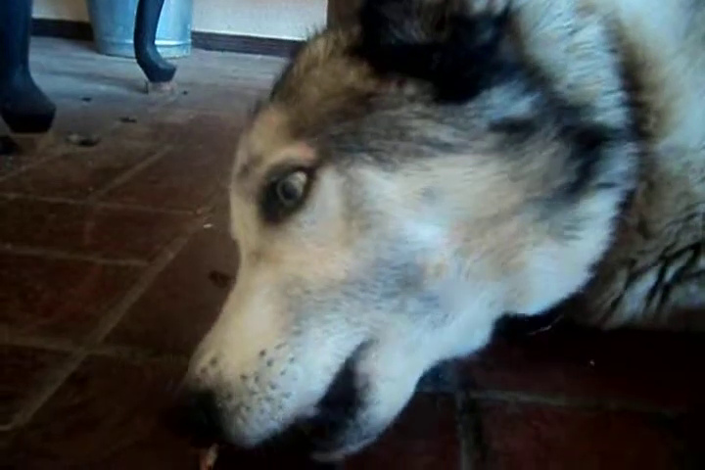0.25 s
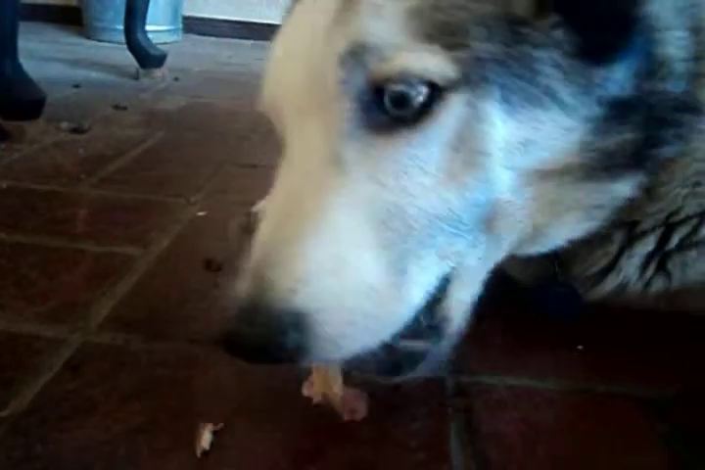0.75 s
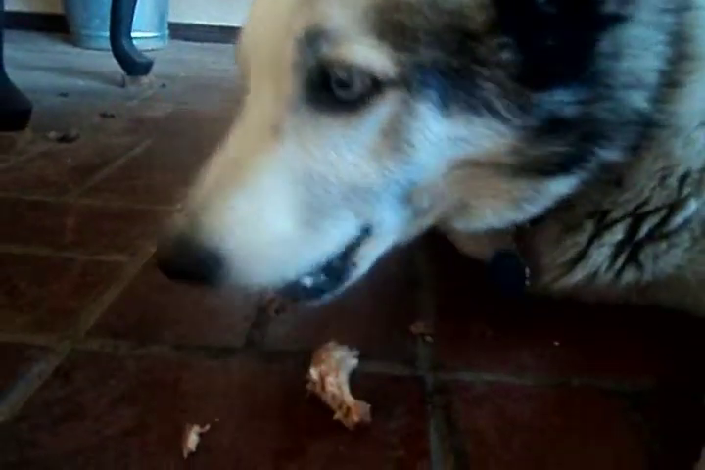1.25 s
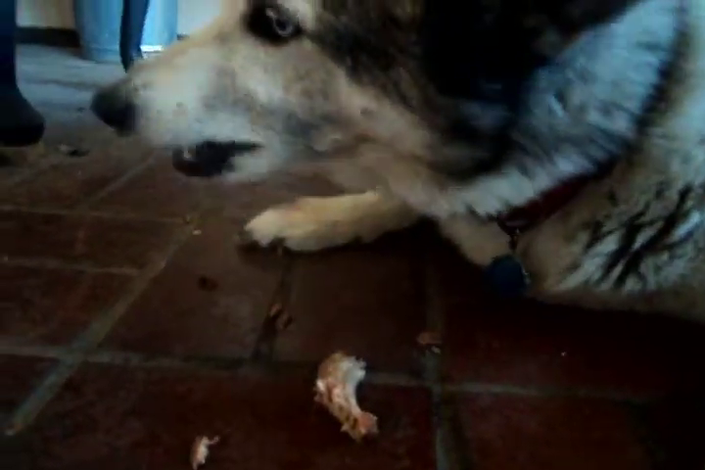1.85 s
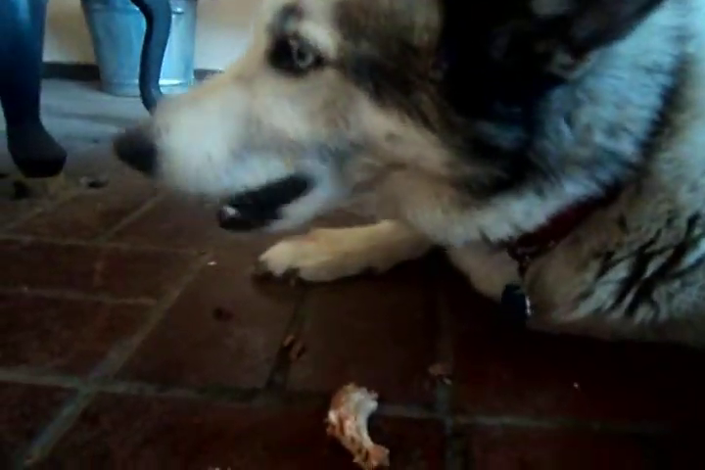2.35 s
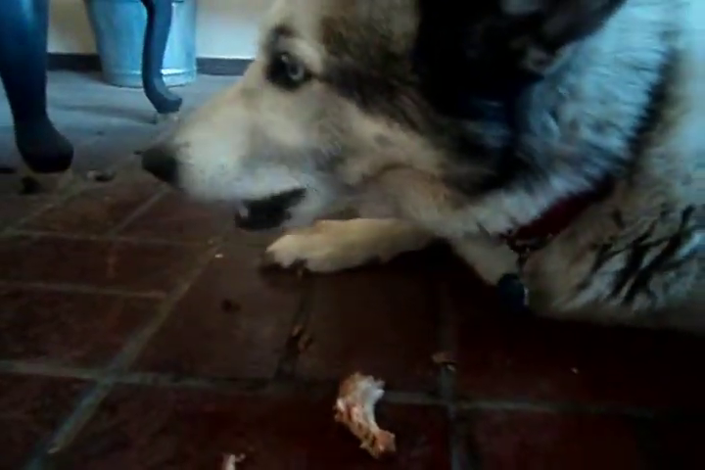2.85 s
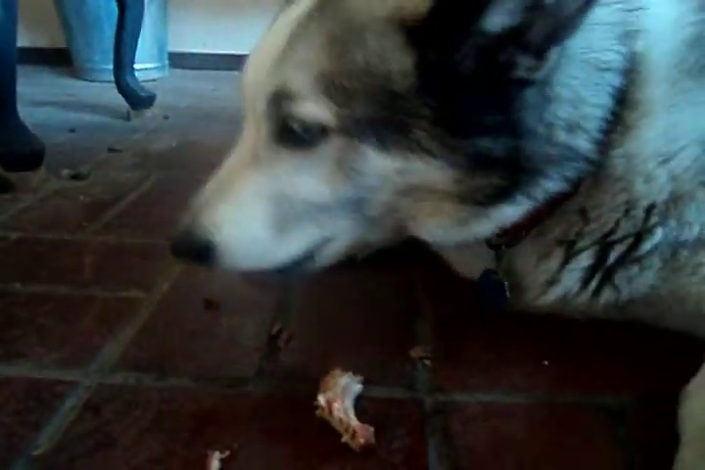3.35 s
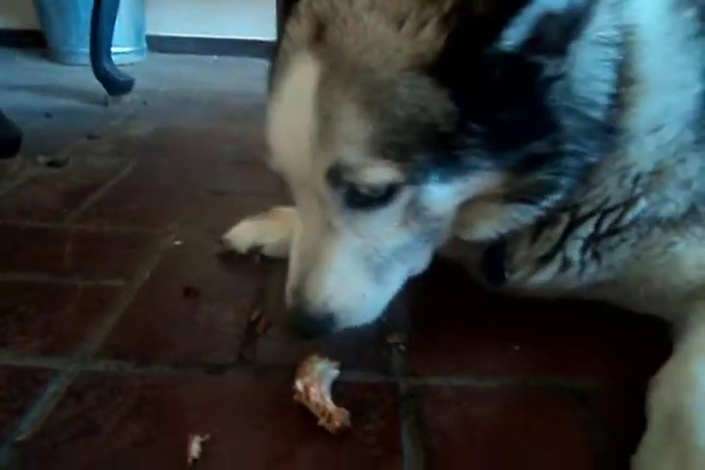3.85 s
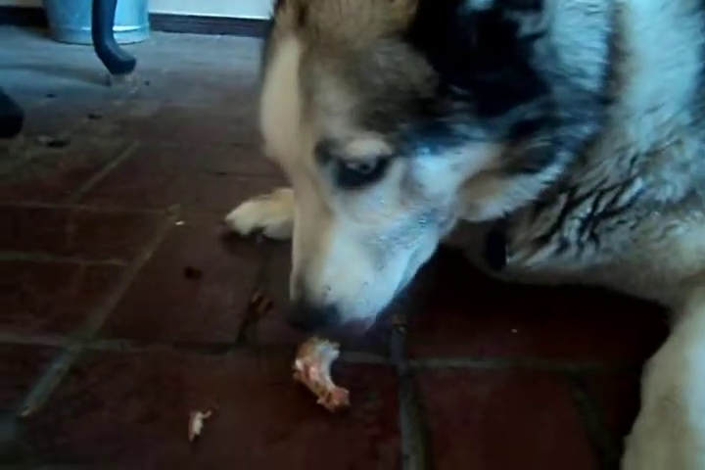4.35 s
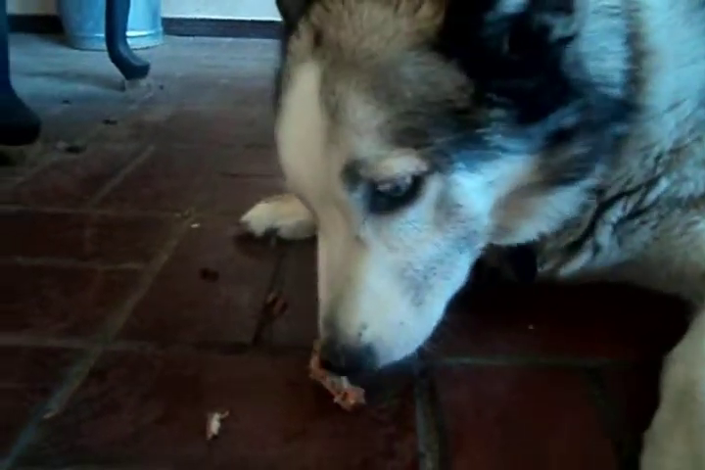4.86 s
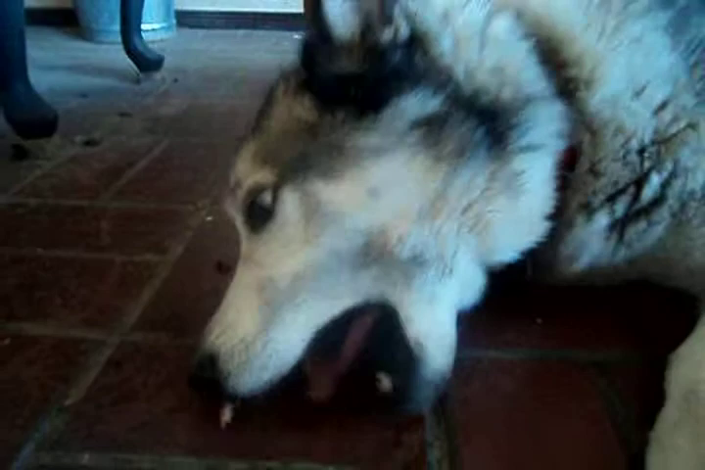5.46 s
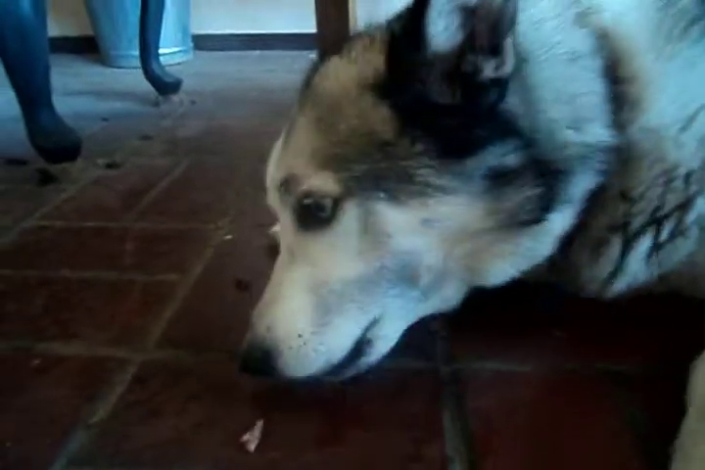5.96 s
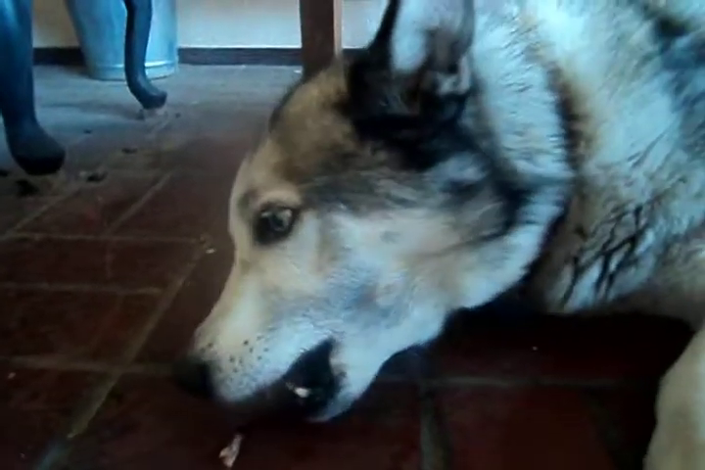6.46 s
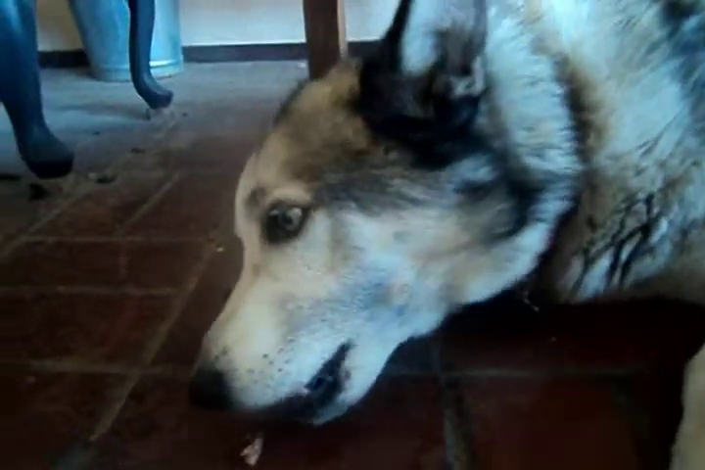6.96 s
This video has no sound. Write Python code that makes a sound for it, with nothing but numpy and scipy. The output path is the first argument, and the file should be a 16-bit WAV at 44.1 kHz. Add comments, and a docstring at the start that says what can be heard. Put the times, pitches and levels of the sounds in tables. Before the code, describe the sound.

A dog cracks a bone with sharp, irregular clicks and wet smacks close by, while another dog barks five times further off in an echoing room.

```python
"""A dog on a tiled floor cracks a bone close to a small microphone: decaying sines for teeth, bone and
mouth hollow, repeated as splinters. Wet smacks and nose breaths are noise in resonances.
A second dog barks five times further off in the house: rough pulses and puffs through an opening throat,
with a strong room tail. Hiss and rumble lie below. Levels are those ahead of the room and microphone."""
import sys
import numpy as np
from scipy import signal
from scipy.io import wavfile
from scipy.ndimage import uniform_filter1d

SR = 44100
rng = np.random.default_rng(int(sys.argv[2]) if len(sys.argv) > 2 else 0)


def wav_record(signal):
    """Record a signal, one row per channel, as 16-bit PCM in the file named by sys.argv[1]."""
    frames = np.transpose(np.atleast_2d(signal))
    bounded = np.clip(frames, -1, 1)
    # unit amplitude maps onto the largest positive 16-bit level
    quanta = np.round(bounded * 32767).astype(np.int16)
    wavfile.write(sys.argv[1], SR, quanta)


def invert_db(level):
    """Linear amplitude ratio for a level in decibels (20 dB per decade), elementwise."""
    return 10 ** (np.asarray(level, dtype=float) / 20)


N = 317520


def evened(x):
    """Scales to rms 1."""
    return x / np.sqrt(np.mean(x ** 2) + 1e-20)


def read(points, hz):
    """Reads a spectrum on a log-frequency axis."""
    f, value = np.transpose(points)
    return np.interp(np.log(hz + 1), np.log(f + 1), value)


def add(mix, start_s, sound):
    """Mixes a sound in at start_s."""
    part = mix[max(round(start_s * SR), 0):][:len(sound)]
    part += sound[:len(part)]


def resonate(x, hz, width_hz):
    """Resonance of gain 1: shifts the curve hz down to zero, smooths, shifts back."""
    turn = np.exp(2j * np.pi * np.cumsum(hz * np.ones(len(x))) / SR)
    r = np.exp(-np.pi * width_hz / SR)
    return 2 * (turn * signal.lfilter([1 - r], [1, -r], x / turn + 1e-18)).real


# Background spectrum. Each row: frequency in Hz, relative density in dB per Hz.
HUSH_SPECTRUM = [(20, -0.5), (60, -4), (125, -2), (300, -4.5), (800, -10.5), (2000, -15), (4000, -19.5),
                 (6500, -23), (7500, -34.5), (9000, -62.5)]


def hush():
    """Steady hiss and rumble: shaped noise with faint drifting patches."""
    level_db, patch_db = -56, 1.2
    frames, hz = N // 256 + 5, np.fft.rfftfreq(1024, 1 / SR)
    a, b, patches = rng.standard_normal((frames, 513, 3)).T
    patches = uniform_filter1d(patches, size=10, axis=0)  # over frequency
    patches = evened(uniform_filter1d(patches, size=20, axis=1))  # over time
    z = (a + 1j * b) * invert_db(read(HUSH_SPECTRUM, hz)[:, None] + patch_db * patches)
    noise = signal.istft(z, nperseg=1024, noverlap=768)[1][:N]
    return invert_db(level_db) * evened(noise)


def smack(level_db, hollow_hz, length_s, chance):
    """Wet noise in a narrow hollow starts quickly and fades."""
    wet = resonate(resonate(chance, hollow_hz, 130), hollow_hz, 320)[:round(length_s * SR)]
    u = np.linspace(0, 1, len(wet))
    swell = np.minimum(u / 0.12, 1) * np.sqrt(1 - u) * 1.42  # 1.42 roughly restores the rms
    return invert_db(level_db) * evened(wet) * swell


# Smacks of tongue and lips. Each row: start in seconds, approximate rms in dB, hollow in Hz, length in seconds.
SMACK_EVENTS = [(0, -47.5, 790, 0.008), (0.612, -55.5, 1070, .04), (.895, -53.5, 1110, 0.031),
                (0.931, -54.5, 1020, 0.035), (1.807, -59.5, 930, 0.058), (1.941, -53, 240, 0.16),
                (1.944, -56, 793, 0.085), (5.044, -52, 820, 0.017), (5.727, -54.5, 650, .11),
                (5.87, -59.5, 870, 0.031), (6.105, -57.5, 784, 0.05), (6.221, -60, 860, 0.053),
                (6.332, -61, 1450, 0.092), (6.821, -61, 890, 0.024), (6.951, -51.5, 820, 0.048)]


def smacks():
    """Tongue and lips part wetly: one noise burst a row."""
    out = np.zeros(N)
    for (start_s, *row), chance in zip(SMACK_EVENTS, rng.standard_normal((len(SMACK_EVENTS), 8000))):
        add(out, start_s, smack(*row, chance))
    return out


# Nose resonances. Each row: centre in Hz, width in Hz, relative level in dB.
NOSE_RESONANCES = [(2180, 1300, -4.5), (3500, 1100, 3.5), (5200, 520, -0.5)]
# Breaths through the chewing dog's nose. Each row: start in seconds, length in seconds, rms between fades in dB.
SNIFF_EVENTS = [(0, 0.12, -74), (1.427, .44, -62), (1.887, 0.42, -59), (6.613, 0.7, -70)]


def sniffs():
    """Air noise in the nose resonances swells and fades with each breath."""
    fade_share = 0.4  # of a breath, both ends together
    air, flow = rng.standard_normal(N), np.zeros(N)
    air = evened(sum(invert_db(db) * resonate(air, hz, width_hz) for hz, width_hz, db in NOSE_RESONANCES))
    for start_s, length_s, level_db in SNIFF_EVENTS:
        add(flow, start_s, invert_db(level_db) * signal.windows.tukey(round(length_s * SR), fade_share))
    return air * flow


# Enamel rings in every tick. Each row: frequency in Hz, level in dB ahead of the hardness, t60 in seconds.
ENAMEL_RINGS = [(3600, -10, 0.006), (4100, -4, 0.0016), (6240, -12.5, 0.0038)]


def crack(peak_db, hollow_hz, tick_hz, tick_db, crunch_db, chance):
    """Bone-and-enamel tick plus a few cycles of mouth hollow; splinters repeat them ever more softly."""
    t = np.arange(len(chance)) / SR
    tick = np.sin(2 * np.pi * tick_hz * t) * invert_db(-60 * t / 0.0039) * (1 - np.exp(-t / 0.00018))
    hard_db = 7.8 * np.log2(tick_hz / 3500)  # a higher tick is a harder contact and wakes the enamel more
    for hz, level_db, t60_s in ENAMEL_RINGS:
        tick += invert_db(hard_db + level_db - 60 * t / t60_s) * np.sin(2 * np.pi * hz * t)

    hollow_t60_s = min(0.035, 10 / hollow_hz)
    ring = np.sin(2 * np.pi * hollow_hz * t) * invert_db(-60 * t / hollow_t60_s) * (1 - np.exp(-t / 0.000079))
    # nothing of the hollow's ring sounds below about half its pitch
    ring = signal.lfilter(*signal.butter(2, hollow_hz * 0.47, "high", fs=SR), ring)

    ring = invert_db(peak_db) * ring / abs(ring).max()
    tick = invert_db(peak_db + tick_db) * tick / abs(tick).max()
    splinters = (abs(chance) > 2) * chance * invert_db(-60 * t / 0.062)
    splinters /= np.linalg.norm(splinters)
    muffled = ring + invert_db(-6) * tick  # later splinters break deeper in the mouth
    return ring + tick, invert_db(crunch_db) * signal.fftconvolve(muffled, splinters)


# Teeth break bone. Each row: start in seconds, hollow peak in dB, mouth hollow in Hz, tick in Hz,
# tick over hollow in dB, crunch of the splinters in dB.
CRACK_EVENTS = [(0.179, -37.5, 2290, 3930, 8.5, 2.5), (0.229, -23, 1250, 3320, 2.5, 0.5),
                (0.247, -23, 1256, 2930, 3, 4.5), (0.9044, -45, 1060, 3320, 4, -10),
                (1.0127, -42.5, 720, 3500, 3.5, -9), (1.144, -41, 675, 1290, -5, -4.5),
                (2.066, -25.5, 886, 1830, 7.5, 2), (5.2666, -25.5, 1056, 3300, -4, -2.5),
                (5.362, -22.5, 606, 3410, 9, -19), (5.393, -27.5, 700, 3500, -11.5, -25),
                (5.9257, -36.5, 1400, 2080, 3, -1), (6.1054, -42.5, 814, 1720, -1, -1),
                (6.2572, -41.5, 1080, 1700, 0, 1), (6.3311, -28.5, 1200, 3600, -6.5, 1),
                (6.485, -46, 1480, 3400, 8, 7.5), (6.7192, -47.5, 1160, 2420, 4, 6.5),
                (6.7932, -24.5, 930, 1790, 0.5, -4.5), (7.073, -46, 910, 1740, -3, -2)]
# A tooth slips off the bone, a bare tick. Each row: start in seconds, tick peak in dB, tick in Hz.
TICK_EVENTS = [(0.2287, -22.5, 2230), (0.4409, -38.5, 3100), (0.819, -39.5, 2680), (0.831, -39.5, 3300),
               (0.947, -42, 3740), (1.316, -39, 3460), (2.0665, -20, 3160), (2.0828, -29.5, 2980),
               (5.3622, -19.5, 1700), (5.5427, -37, 3260), (5.8633, -43, 3720), (6.5712, -36.5, 4280),
               (6.736, -41, 2630), (6.7936, -29, 2730)]
# The jaw or the bone knocks dully. Each row: start in seconds, peak in dB, frequency in Hz.
KNOCK_EVENTS = [(0.2475, -24.5, 650), (0.249, -27.5, 305), (2.0737, -35, 315), (2.4856, -37.5, 508),
                (6.8033, -34.5, 213), (6.8734, -38.5, 716)]


def bone_blows():
    """Cracks, ticks and knocks share one mechanism; returns direct blows and splinter crunch."""
    tick_hollow_hz, tick_over_db, tick_crunch_db = 910, 12.5, -4.5
    overtone_ratio, overtone_db, knock_crunch_db = 3.1, -24.5, -11
    ticks = [(s, db - tick_over_db, tick_hollow_hz, hz, tick_over_db, tick_crunch_db)
             for s, db, hz in TICK_EVENTS]
    knocks = [(s, db, hz, hz * overtone_ratio, overtone_db, knock_crunch_db) for s, db, hz in KNOCK_EVENTS]
    events = CRACK_EVENTS + ticks + knocks
    out, crunch = np.zeros(N), np.zeros(N)
    for (start_s, *row), chance in zip(events, rng.standard_normal((len(events), 4000))):
        blow, splinters = crack(*row, chance)
        add(out, start_s, blow)
        add(crunch, start_s, splinters)
    return out, crunch


# Room decay. Each row: frequency in Hz, t60 in seconds.
ROOM_DECAY = [(250, 0.83), (700, 0.48), (1700, 0.66), (4500, 0.54)]


def room(x, delay_s):
    """Sparse taps of random sign, one in every 20 samples, each band dying at its own speed."""
    taps = np.zeros(SR)
    at = np.arange(0, SR - 20, 20) + rng.integers(0, 20, SR // 20 - 1)
    taps[at] = rng.choice([-1., 1.], len(at))
    hz, t, z = signal.stft(taps, SR, nperseg=256)
    decay = invert_db(-60 * t / read(ROOM_DECAY, hz)[:, None])
    tail = signal.istft(z * decay, SR, nperseg=256)[1]
    tail = np.concatenate([np.zeros(round(delay_s * SR)), tail])
    return signal.fftconvolve(x, tail / np.linalg.norm(tail))[:N]


def gesture(rise_s, hold_s, peak_db, top_hz, widest):
    """Effort in dB, pitch in Hz, roughness and mouth opening along one bark."""
    release_s, start_db, sag_db, end_db, bend = 0.039, -27, -4, -23, 1.6
    first_hz, climb_power, droop_share = 285, 1.6, 0.21  # droop: pitch lost in the release
    shut_share, opening_share, closing_share = 0.32, 0.21, 0.075  # opening: time constant over rise_s
    rough_start, rough_end = 0.35, 0.65
    t = np.arange(0, rise_s + hold_s + release_s, 1 / SR)
    rise = np.clip(t / rise_s, 0, 1)
    hold = np.clip((t - rise_s) / hold_s, 0, 1)
    release = np.clip((t - rise_s - hold_s) / release_s, 0, 1)

    effort_db = peak_db + start_db * (1 - rise) ** bend + sag_db * hold + end_db * release
    climb_hz = top_hz - (top_hz - first_hz) * (1 - rise) ** climb_power
    hz = climb_hz * (1 - droop_share * release)
    mouth = widest * (1 - (1 - shut_share) * np.exp(-t / rise_s / opening_share))
    mouth = mouth * (1 - closing_share * (hold + release))
    rough = rough_start + (rough_end - rough_start) * t / t[-1]
    return effort_db, hz, rough, mouth


# Throat resonances. Each row: centre in Hz ahead of the mouth factor, first-pass width in Hz,
# level in dB ahead of the rasp tilt.
THROAT_RESONANCES = [(686, 506, -12.5), (1020, 150, 10), (1493, 375, -6.5), (2415, 840, -15),
                     (3380, 650, -14), (4280, 900, -25), (6850, 1700, -31.5)]


def bark(row, tongue, chance):
    """Jittered pulses and puffs of noise pass a throat that opens as the pitch climbs."""
    effort_db, hz, rough, mouth = gesture(*row)
    jitter, noise = chance[:, :len(hz)]
    turns = np.cumsum(hz * (1 + 1.5 * rough * uniform_filter1d(jitter, size=100))) / SR
    # the noise takes over above these harmonics
    folds = sum(invert_db(-2.5 * k) * np.cos(2 * np.pi * k * turns) for k in range(1, 12))
    folds *= 1 + 0.5 * rough * np.cos(np.pi * turns)  # strong and weak pulses alternate
    puffs = (0.51 + np.exp(-(turns % 1) / 0.31)) * noise
    drive = (1 - rough) * evened(folds) + 2.97 * rough * evened(puffs)

    rasp_db_per_octave = 25 * (mouth - 0.97)  # a wider mouth is brighter
    voice = 0
    for k, (f, width_hz, db) in enumerate(THROAT_RESONANCES + [tongue]):
        gape = mouth if k < 3 else mouth ** 0.48  # the jaw moves the low resonances most
        gain = (-1) ** k * invert_db(db + rasp_db_per_octave * np.log2(f / THROAT_RESONANCES[1][0]))
        voice = voice + gain * resonate(resonate(drive, f * gape, width_hz), f * gape, 2 * width_hz)

    # the fundamental also leaves through the chest; a lower voice is chestier
    chest_db = -14 - 17.5 * np.log2(hz.max() / 680)
    voice = voice + invert_db(chest_db) * (1 - rough) * hz / hz.max() * np.sin(2 * np.pi * turns)
    effort = invert_db(effort_db)
    return evened(effort * voice) * np.sqrt(np.mean(effort ** 2)) * signal.windows.tukey(len(hz), 0.05)


# Barks. Each row: start in seconds, rise in seconds, hold in seconds, effort peak in dB, top pitch in Hz,
# widest mouth as a factor on the throat (approached, not quite reached).
BARK_EVENTS = [(2.12, 0.063, 0.038, -21.5, 655.6, 1.14), (2.568, 0.066, 0.046, -22.5, 698, 0.99),
               (2.866, 0.062, 0.047, -21, 671.6, 1.005), (3.086, .075, 0.038, -20.5, 682.7, 1.029),
               (3.513, 0.045, 0.015, -28, 462.6, 0.917)]
# One more resonance for each bark. Each row: as in THROAT_RESONANCES.
TONGUE_RESONANCES = [(1660, 570, -17.5), (2270, 230, -1), (2286, 270, -4), (2264, 450, -6.5),
                     (1970, 350, -0.5)]


def barking():
    """Each bark comes from a slightly different spot: direct sound plus a room tail drawn anew."""
    far = np.zeros(N)
    chances = rng.standard_normal((len(BARK_EVENTS), 2, SR // 4))
    for (start_s, *row), tongue, chance in zip(BARK_EVENTS, TONGUE_RESONANCES, chances):
        dog = np.zeros(N)
        add(dog, start_s, bark(row, tongue, chance))
        far += invert_db(-1) * dog + invert_db(-4) * room(dog, 0.012)
    return far


def scene():
    """The near dog is nearly dry, its crunch reaches the walls; the far dog brings its own tails."""
    blows, crunch = bone_blows()
    near = blows + smacks() + sniffs()
    echo = room(invert_db(-41) * near + invert_db(-8.5) * crunch, 0.011)
    return (near + crunch + echo + barking() + hush())[None]


# Microphone response. Each row: frequency in Hz, gain in dB.
MICROPHONE_RESPONSE = [(20, 3.5), (3600, 2), (4600, 1), (5250, -2.5), (5550, -10), (5850, -5),
                       (6800, -11.5), (7300, -14), (7650, -23), (7900, -54.5), (9000, -83.5)]


def microphone(x):
    """Causal minimum-phase filter: a treble notch and a steep upper edge."""
    log_gain = np.log(invert_db(read(MICROPHONE_RESPONSE, abs(np.fft.fftfreq(4096, 1 / SR)))))
    taps = np.fft.ifft(np.exp(np.conj(signal.hilbert(log_gain)))).real[:2048]
    return signal.oaconvolve(x, taps)[:len(x)]


def mirrored(x):
    """Faint modulation at mirror_hz leaves images either side of it, plainest for loud sounds."""
    mirror_hz, depth_db = 11025, -58
    return x * (1 + invert_db(depth_db) * np.cos(2 * np.pi * mirror_hz * np.arange(N) / SR))


def roll_off(x):
    """The treble ends steeply here."""
    return signal.sosfilt(signal.butter(12, 14400, fs=SR, output="sos"), x)


def record(dry):
    """The small microphone, then faint mirror images about 11025 Hz."""
    mix = mirrored(microphone(dry[0]))[None]
    return roll_off(mix)


dry = scene()
out = record(dry)
wav_record(out)
```